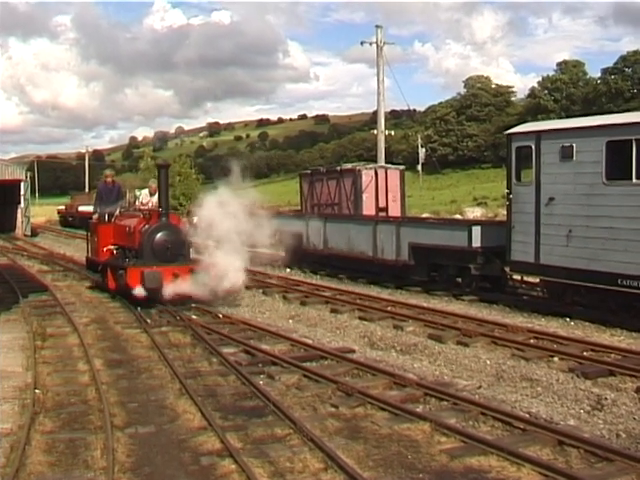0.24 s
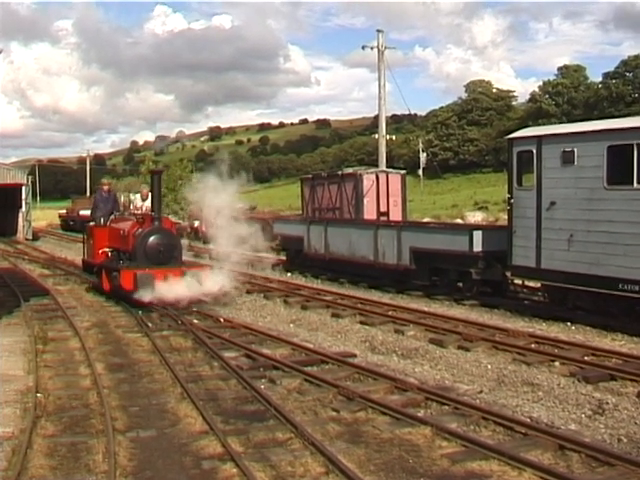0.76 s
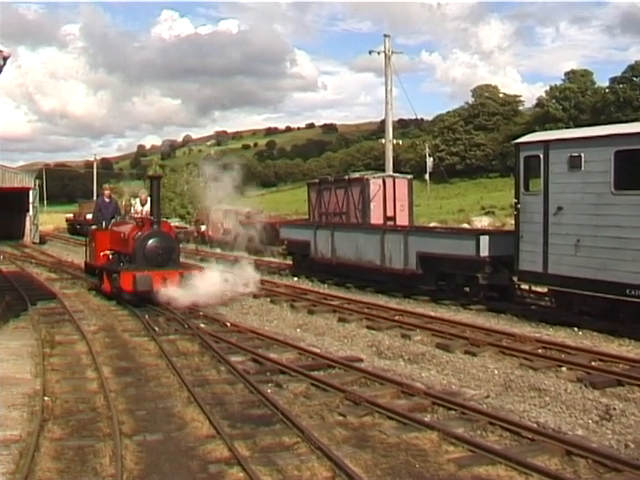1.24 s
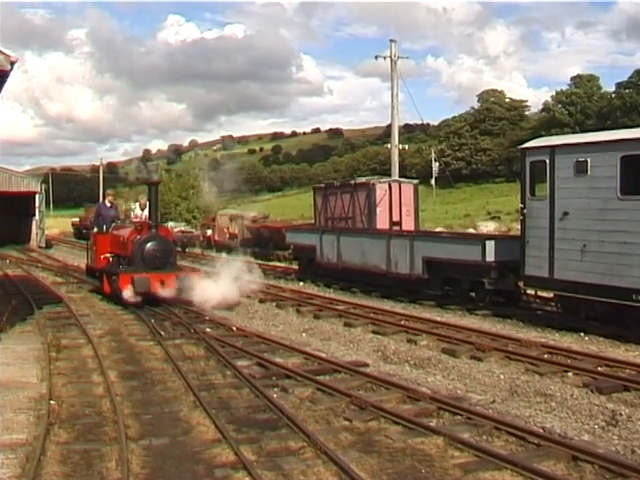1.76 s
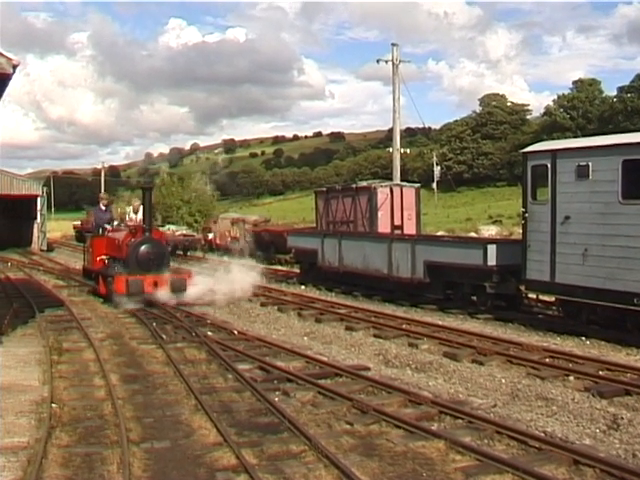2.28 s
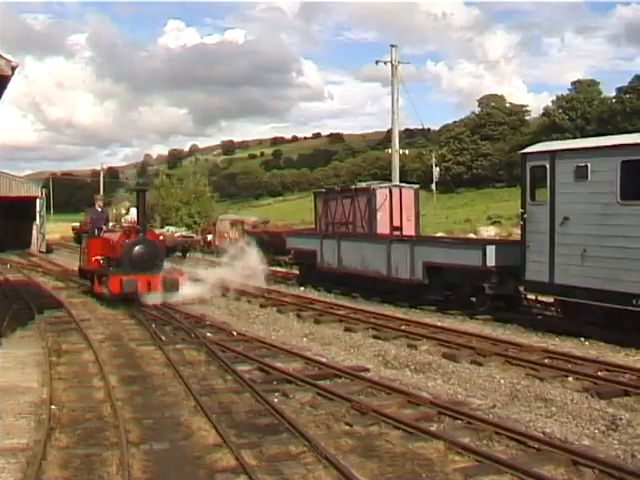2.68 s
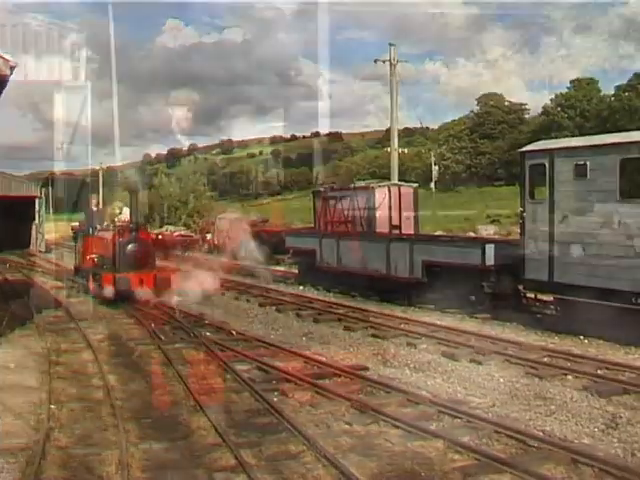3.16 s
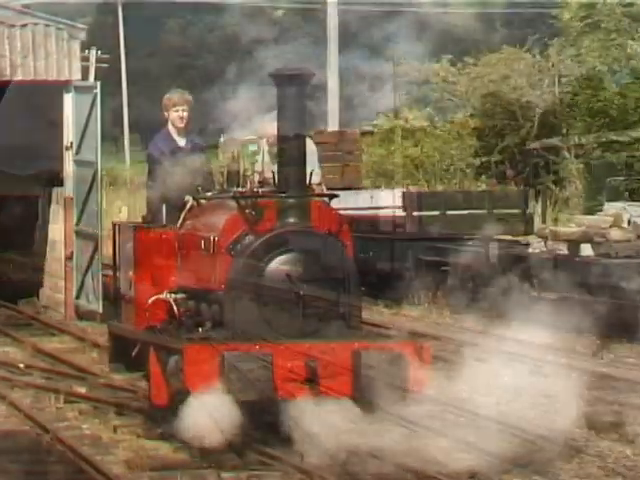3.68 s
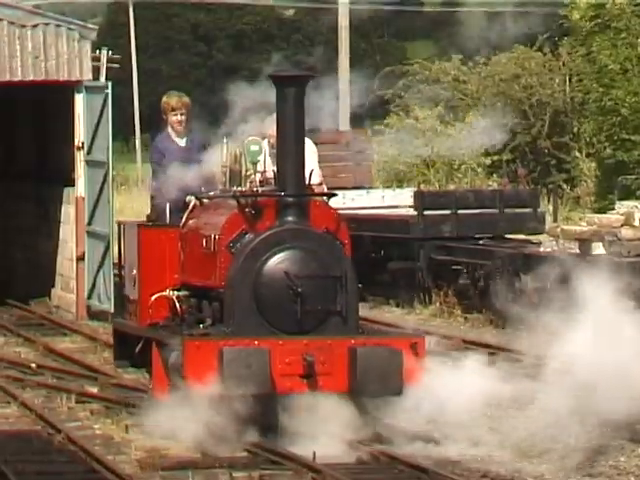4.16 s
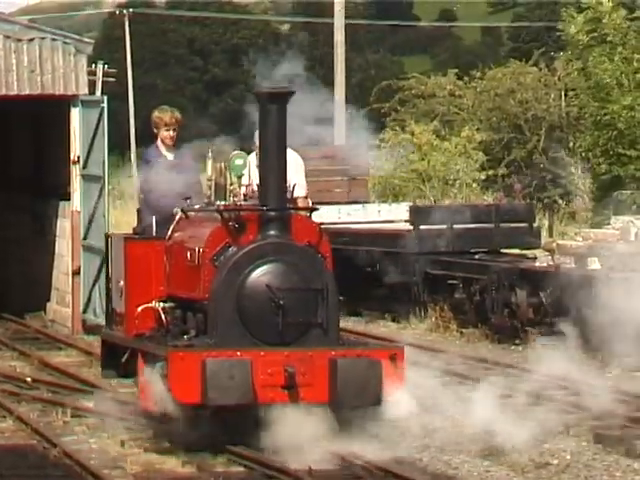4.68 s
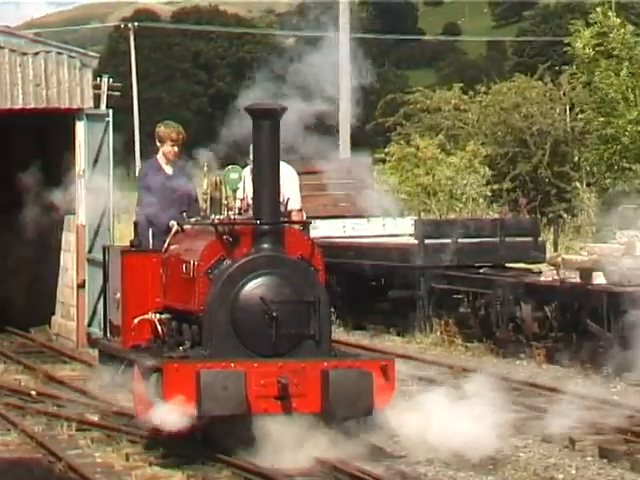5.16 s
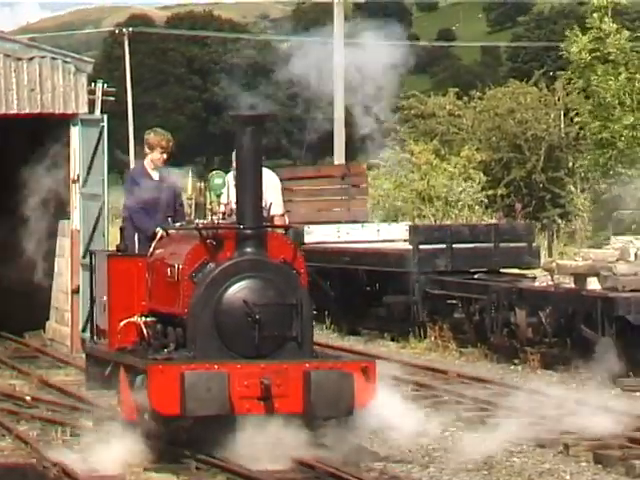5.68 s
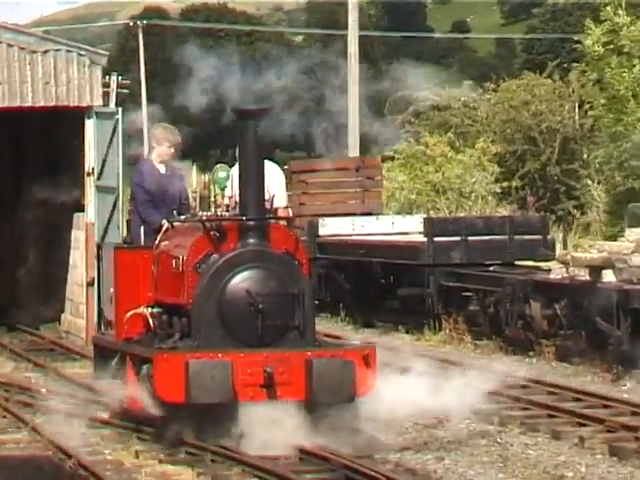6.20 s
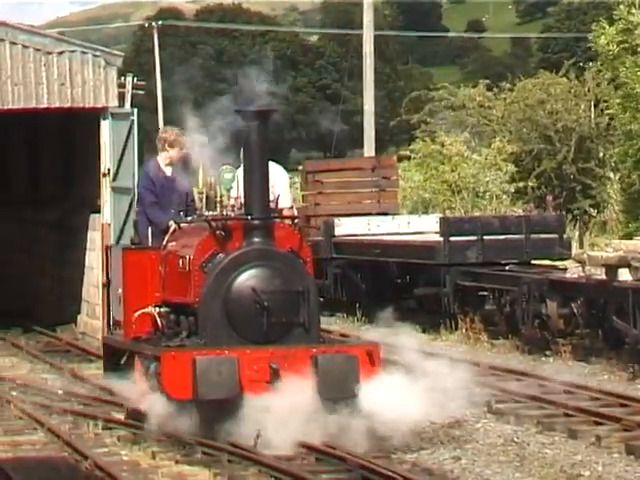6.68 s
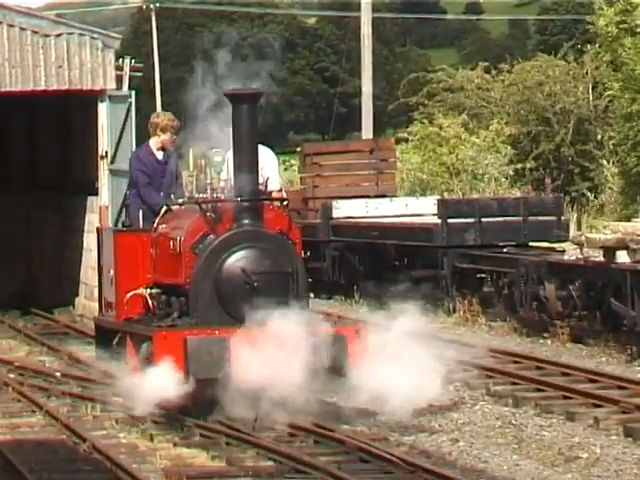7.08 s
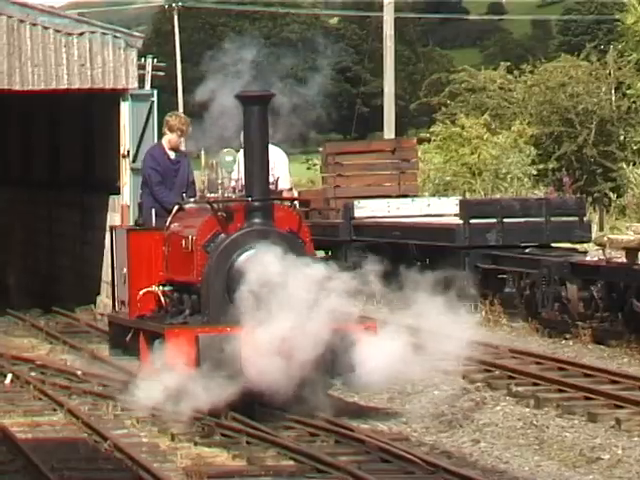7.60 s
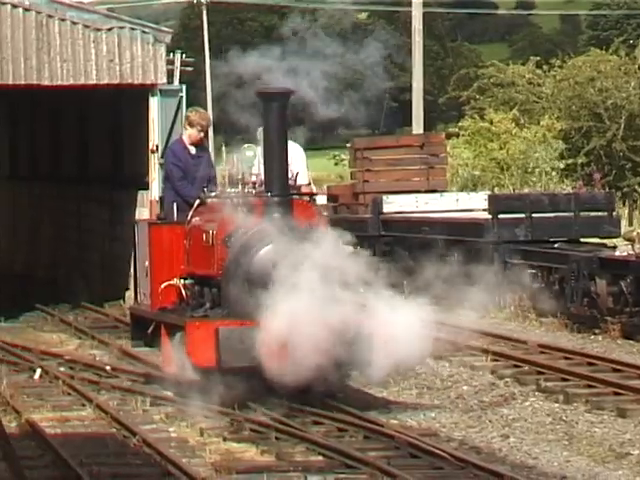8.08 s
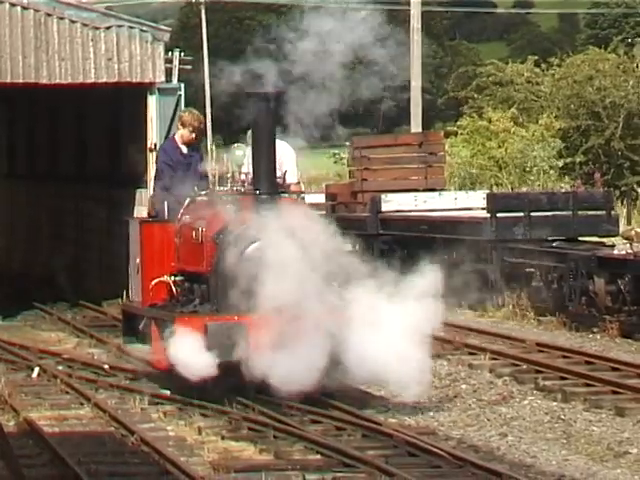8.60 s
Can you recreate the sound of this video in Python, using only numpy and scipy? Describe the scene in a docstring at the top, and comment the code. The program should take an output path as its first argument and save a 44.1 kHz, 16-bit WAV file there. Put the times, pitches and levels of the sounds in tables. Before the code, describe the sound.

Bright, wet steam hiss surges again and again from a slow little engine, with faint clanks and light wind on the microphone.

```python
"""Steam locomotive with open drain cocks

A small engine creeps through a railway yard. Each piston stroke sends a surge of wet steam hissing
through the ringing drain pipes; the running gear knocks and squeaks now and then. Behind it the yard
rumbles, a distant road vehicle gathers speed and wind buffets the microphone.
Nearly all the sound sits on the left."""
import sys
import numpy as np
from scipy import signal
from scipy.fft import rfft, irfft, next_fast_len
from scipy.io import wavfile
from scipy.ndimage import uniform_filter1d

SR = 44100
rng = np.random.default_rng(int(sys.argv[2]) if len(sys.argv) > 2 else 0)


def wav_out(sig):
    """Save sig, one row per channel (or a flat mono array), as 16-bit PCM at SR to the path in sys.argv[1]."""
    wavfile.write(sys.argv[1], SR, np.round(np.clip(np.atleast_2d(sig).T, -1, 1) * 32767).astype(np.int16))


N = 390264
T = np.arange(N) / SR


def from_db(db):
    """Decibels to gain."""
    return np.exp(np.asarray(db) * (np.log(10) / 20))


def rms_one(x):
    """Scale to unit rms."""
    return x / np.sqrt(np.mean(x ** 2) + 1e-20)


def evened(x):
    """Hold the rms at 1 over a fifth of a second."""
    return x / np.sqrt(uniform_filter1d(x ** 2, size=SR // 5) + 1e-20)


def in_time(rows):
    """The columns of a breakpoint curve at every sample."""
    time_s, *columns = np.transpose(rows)
    return [np.interp(T, time_s, column) for column in columns]


def drift(rate_hz):
    """Smooth random wander with spread 1."""
    hop, settle = 40, 2000
    pole = np.exp(-2 * np.pi * rate_hz * hop / SR)
    noise = rng.standard_normal(N // hop + settle + 2)
    slow = signal.lfilter([1], [1, -2 * pole, pole * pole], noise)[settle:]
    return np.interp(np.arange(N) / hop, np.arange(len(slow)), rms_one(slow))


def coloured_noise(spectrum):
    """Noise of unit rms, shaped by rows of freq_hz, density_db."""
    size = next_fast_len(N)
    hz, db = np.transpose(spectrum)
    bins = np.maximum(np.fft.rfftfreq(size, 1 / SR), 1)
    gain = from_db(np.interp(np.log(bins), np.log(hz), db)) * (bins > hz[0] / 2) * (bins < hz[-1] * 2)
    return rms_one(irfft(rfft(rng.standard_normal(size)) * gain, size)[:N])


def resonate(x, hz, width_hz):
    """One resonance, gain 1 at its peak."""
    r = np.exp(-np.pi * width_hz / SR)
    feedback = [1, -2 * r * np.cos(2 * np.pi * hz / SR), r * r]
    return signal.lfilter(np.array([1, 0, -1]) * (1 - r * r) / 2, feedback, x + 1e-18)


def noise_band(hz, width_hz):
    """Noise sent twice through one resonance, for steeper skirts."""
    return resonate(resonate(rng.standard_normal(N), hz, width_hz), hz, width_hz)


def low_pass(x, hz, order):
    """Butterworth low-pass."""
    return signal.sosfilt(signal.butter(order, hz, fs=SR, output="sos"), x)


def swell(start_s, length_s):
    """A rounded rise and fall."""
    return np.sqrt(np.sin(np.pi * np.clip((T - start_s) / length_s, 0, 1)).clip(0))


def yard(trim_db=2.5, patchy_db=1.5):
    """Low roar of the rolling engine and its surroundings."""
    # colour of the rumble: freq_hz, density_db
    spectrum = [(25, 10.5), (60, -5), (130, -1), (200, 4), (270, 5), (350, 3.5), (480, 1.5), (700, 0.5),
                (1000, -2), (1400, -5.5), (2500, -3), (6000, -33)]
    # rise and fall of the rumble: time_s, level_db
    levels = [(0, -50.5), (2.8, -51.5), (3.3, -48.5), (3.98, -49.5), (4.02, -55), (5.4, -54), (7.7, -55.5),
              (8.45, -53.5), (8.85, -54)]
    return coloured_noise(spectrum) * from_db(in_time(levels)[0] + trim_db + patchy_db * drift(9.1))


def traffic(octave_db=-11, waver=0.0029):
    """A distant road vehicle's firing note climbs, and its gears whine above it."""
    # engine gathering speed: time_s, firing_hz, level_db
    engine = [(0, 44.8, -72), (.45, 45.7, -53), (1, 52.4, -62.5), (2, 60.7, -54.5), (2.8, 69, -60.5),
              (3.5, 76.5, -44), (4, 81.1, -53), (4.6, 85.1, -50), (5.2, 89, -60)]
    # gear whines, one glide each: start_s, end_s, start_hz, end_hz, level_db
    whines = [(1.802, 2.696, 350.5, 406, -60), (2.552, 3.258, 402.4, 451, -55.5),
              (3.252, 4.032, 372.6, 419, -53), (5.7, 7.102, 284, 298.3, -61.5)]
    firing_hz, engine_db = in_time(engine)
    phase = 2 * np.pi * np.cumsum(firing_hz) / SR
    fade_out = 2 * np.clip(engine[-1][0] - T, 0, .5)
    out = from_db(engine_db) * (np.sin(phase) + from_db(octave_db) * np.sin(2 * phase)) * fade_out
    for start_s, end_s, start_hz, end_hz, level_db in whines:
        pitch_hz = np.interp(T, [start_s, end_s], [start_hz, end_hz]) * (1 + waver * drift(8.3))
        envelope = from_db(level_db + 0.6 * drift(4)) * swell(start_s, end_s - start_s)
        out += envelope * np.sin(2 * np.pi * np.cumsum(pitch_hz) / SR)
    return np.sqrt(2) * out


def wind(trim_db=1.0, lumpy_db=2.0):
    """Eddies thump the microphone: a breeze that rises and falls, with short gusts on top."""
    # bed of breeze: time_s, level_db
    breeze = [(0, -60), (1, -56), (2.85, -61.5), (3.05, -47.5), (3.6, -42.5), (4.2, -50), (4.7, -43.5),
              (5.6, -44), (6.1, -49.5), (6.85, -49.5), (7.15, -60), (8.3, -56), (8.85, -63)]
    # gusts: start_s, length_s, level_db
    gusts = [(.58, 0.13, -46.5), (2.08, 0.097, -48), (3.25, 0.091, -39.5), (3.47, .2, -38),
             (3.68, 0.097, -37.5), (4.43, .08, -43), (4.67, 0.071, -37), (4.848, .06, -47),
             (4.988, .17, -39), (5.306, 0.081, -40), (5.487, 0.11, -42), (5.69, .17, -41),
             (6.286, 0.084, -42.5), (6.788, .07, -42), (7.08, .04, -43), (8.1, .14, -51)]
    # colour of the eddies: freq_hz, density_db
    spectrum = [(12, -37), (20, -2.5), (48, -0.5), (81, -0.5), (128, -4.5), (242, -20), (285, -22.5),
                (315, -30), (400, -29), (520, -53), (880, -120)]
    gust_power = sum((from_db(db) * swell(start_s, length_s)) ** 2 for start_s, length_s, db in gusts)
    power = from_db(in_time(breeze)[0]) ** 2 + gust_power
    eddies = evened(coloured_noise(spectrum) * from_db(lumpy_db * drift(21)))
    return eddies * from_db(trim_db) * np.sqrt(power)


def running_gear(spread_octaves=0.21, squeak_width_hz=90):
    """Slack in the rods and wheels takes up in short rattles that ring the frame; the wheels squeak."""
    # ring of the frame: pitch_hz, width_hz, level_db
    frame_modes = [(187, 42, -1.5), (245, 29, 1.5), (298, 67, 2), (516, 94, -8), (678, 48, 4),
                   (870, 110, -0.5), (1140, 200, 1)]
    # knocks, each strongest around one pitch: start_s, level_db, pitch_hz, decay_s
    knocks = [(2.098, -38, 1000, .015), (2.123, -41.5, 650, 0.044), (2.131, -41.5, 252, 0.056),
              (2.23, -47, 240, 0.044), (3.888, -33, 1000, 0.018), (3.965, -40, 603, 0.022),
              (5.956, -40.5, 746, 0.0092), (6.601, -46, 680, 0.0073), (7.886, -37, 190, 0.036),
              (7.902, -46, 520, .03), (7.908, -49, 950, .025), (8.388, -43.5, 220, 0.027),
              (8.445, -41.5, 220, 0.053), (8.53, -49, 219, 0.075)]
    # wheel squeaks: start_s, length_s, pitch_hz, level_db
    squeaks = [(2.098, .06, 3170, -39), (2.204, 0.067, 2850, -42), (3.933, 0.069, 3040, -35.5),
               (3.97, 0.031, 3420, -32.5)]
    age = np.arange(SR // 4) / SR
    out = np.zeros(N)
    for mode_hz, width_hz, mode_db in frame_modes:
        contacts = np.zeros(N)
        for start_s, level_db, pitch_hz, decay_s in knocks:
            start = int(start_s * SR)
            reach = np.exp(-.5 * (np.log2(mode_hz / pitch_hz) / spread_octaves) ** 2)
            contacts[start:start + len(age)] += from_db(level_db) * reach * np.exp(-age / decay_s)
        ring = resonate(contacts * rng.standard_normal(N), mode_hz, width_hz)
        out += from_db(mode_db) * ring * np.sqrt(SR / (np.pi * width_hz))  # same power at any width
    for start_s, length_s, pitch_hz, level_db in squeaks:
        squeak = rms_one(resonate(rng.standard_normal(N), pitch_hz, squeak_width_hz))
        out += from_db(level_db) * swell(start_s, length_s) * squeak
    return out


def scatter(x, echo_db=-10.0, decay_s=0.014, count=3):
    """Ballast, rails and wagons throw back a haze of weak echoes, which slowly shifts."""
    delay = np.arange(SR // 12) / SR
    weights = np.array([drift(0.84) for _ in range(count)])
    weights /= np.sqrt(np.sum(weights ** 2, axis=0) + 1e-3)
    haze = 0
    for weight in weights:
        echoes = rng.standard_normal(len(delay)) * np.exp(-delay / decay_s)
        haze += weight * signal.oaconvolve(x, echoes / np.sqrt(np.sum(echoes ** 2)))[:N]
    return x + from_db(echo_db) * haze


def spray(surge_db, base_db=-7.5, decline_db_per_s=0.54, thinning=0.21):
    """Level curve of the spray in dB: it thins slowly as time goes on, and in strong surges."""
    # slugs of condensed water sizzling out: start_s, length_s, boost_db
    slugs = [(.14, .12, 2), (.3, 1.3, 3), (2.08, 0.27, 2.5), (2.62, 0.53, 2.5), (3.3, .7, 2.5),
             (4.05, .25, 2), (4.319, .31, 4.5), (5.29, .18, 3.3), (5.65, 0.28, 3.5), (6.64, 0.13, 3),
             (7.24, .16, 4), (7.6, 0.5, 2.5), (8.24, 0.24, 4)]
    boost_db = sum(db * swell(start_s, length_s) for start_s, length_s, db in slugs)
    return base_db - decline_db_per_s * T - thinning * surge_db + boost_db


def strokes(sag_db_per_s=5.5, shut_db_per_s=33.5, leak_hollow_db=-11, leak_edge_db=-17):
    """Strokes swell and tint the leak's hiss; gives flow, hollow tone, edge tone and spray in dB."""
    # steady leak from the cocks: time_s, level_db
    leak = [(0, -32), (2.8, -33), (3.98, -31), (4.01, -31.5), (5, -32.5), (7.4, -38), (8.85, -33.5)]
    # one surge a stroke, relative to the leak: start_s, attack_s, open_s, level_db, hollow_db, edge_db
    surges = [(-.1, .12, 0.19, -.4, 3.5, 0), (.198, 0.1, .37, 8, 2.5, 1), (.64, 0.12, 0.33, 2, 1, -4),
              (.99, 0.089, .22, 3.5, -0.5, -4), (1.35, .12, 0.22, 1, -3, 5), (1.65, .13, .32, 7.5, 0.1, -4),
              (2.09, .12, 0.24, 0.8, 2, 3), (2.37, 0.13, .26, 2.5, 0.2, 2), (2.88, 0.046, 0.095, 4, 3, -4),
              (3.07, 0.091, 0.5, 7.5, -0.3, -1), (3.49, 0.1, 0.49, 5, -1, 4), (4.29, .1, 0.26, 0, 0, -2),
              (5.085, 0.13, 0.4, 6.5, -4, 7), (5.64, .1, 0.3, 0.5, -3, 4), (6.02, 0.17, .34, 2.5, -3, 7),
              (6.5, .12, 0.28, 1, -5, 3), (6.86, 0.11, 0.29, 6, 3.5, -3), (7.39, 0.099, 0.26, -5, 8, -4),
              (7.75, 0.12, .25, -1, 0, -3), (8.165, 0.17, .3, 9.8, -4, -11), (8.5, 0.17, .4, 11, -2, -12)]
    power, hollow_tint, edge_tint = 1, 0, 0
    for start_s, attack_s, open_s, level_db, hollow_db, edge_db in surges:
        age = np.maximum(T - start_s, 0)
        # a surge sinks slowly while the port is open, fast once it shuts
        fall_db = sag_db_per_s * age + shut_db_per_s * np.maximum(age - open_s, 0)
        surge = (np.minimum(age / attack_s, 1) * from_db(level_db - fall_db)) ** 2
        power += surge
        hollow_tint += hollow_db * surge
        edge_tint += edge_db * surge
    surge_db = 10 * np.log10(power)
    flow_db = in_time(leak)[0] + surge_db
    return flow_db, leak_hollow_db + hollow_tint / power, leak_edge_db + edge_tint / power, spray(surge_db)


def choke(start_s=1.67, length_s=0.46, centre_hz=4700, width_hz=3100, level_db=-4):
    """One cock chokes briefly and blows a lower, broader rush."""
    return rms_one(noise_band(centre_hz, width_hz)) * from_db(level_db) * swell(start_s, length_s)


def edge_tone(pitch_hz=4950, width_hz=220, waver_hz=120):
    """At the lip of a cock the flow almost locks into a whistle: a narrow, wavering band of noise."""
    phase = 2 * np.pi * np.cumsum(pitch_hz + waver_hz * drift(25.03)) / SR
    along, across = low_pass(rng.standard_normal((2, N)), width_hz / 2, order=2)
    return rms_one(along * np.cos(phase) + across * np.sin(phase))


def drain_pipes(flutter_db=0.8, patchy_db=0.65):
    """Turbulence rings the drain pipes, each resonance flickering on its own."""
    # pipe resonances: pitch_hz, width_hz, level_db
    pipe_modes = [(1528, 340, -7), (1791, 490, -2), (2686, 490, -5), (3000, 490, -6.5), (3630, 1040, -8.5),
                  (4530, 480, -6.5), (5094, 740, -0.5), (5740, 1380, -2), (7000, 1200, -9.5),
                  (7980, 2200, -10), (9600, 1520, -5.5), (10800, 1300, -10.5), (12860, 4000, -5)]
    out = 0
    for pitch_hz, width_hz, level_db in pipe_modes:
        ring = noise_band(pitch_hz, width_hz)
        out += ring * from_db(level_db + flutter_db * drift(25) + patchy_db * drift(4.1))
    return rms_one(out)


def steam(flow_db, hollow_db, edge_db, spray_db, edge_flutter_db=1.6, sputter_db=0.36,
          hollow_trim_db=-1.56, hiss_trim_db=-1.89, sizzle_trim_db=-2.5):
    """Steam leaves the ringing pipes as a free jet; the water in it makes it sizzle and sputter."""
    # broad rush of the free jet: freq_hz, density_db
    spectrum = [(300, -28), (800, -8), (1300, -5.5), (2000, -2.5), (2350, -6), (3000, 1), (4200, -0.5),
                (6500, 0), (8500, -1.5), (10000, 3), (11500, -5.5), (13500, -4), (16000, -8)]
    # balance of the jet against the pipe ring: time_s, level_db
    jet_share = [(0, 1), (1.4, 3), (2.8, 1), (4, -3.5), (5.3, -6), (6.5, -6), (7.6, -3.5), (8.85, -4)]
    jet = evened(drain_pipes() + from_db(in_time(jet_share)[0]) * coloured_noise(spectrum))
    jet = scatter(jet + choke() + edge_tone() * from_db(edge_db + edge_flutter_db * drift(16.0)))
    # the hollow low pipe tone and the fine spray come and go with the wetness of the steam
    low = signal.sosfiltfilt(signal.butter(6, 2300, fs=SR, output="sos"), jet)
    high = signal.sosfiltfilt(signal.butter(4, 11000, "high", fs=SR, output="sos"), jet)
    hiss = evened(jet - low - high) * from_db(hiss_trim_db)
    hollow = evened(low) * from_db(hollow_db + hollow_trim_db)
    sizzle = evened(high) * from_db(uniform_filter1d(spray_db, size=SR // 10) + sizzle_trim_db)
    return (hiss + hollow + sizzle) * from_db(flow_db + sputter_db * drift(61))


def scene(gain_db=5.0, background_db=3.0, bleed_db=-10.0, bleed_hz=700, stray_db=-29, murk_db=-16):
    """The mix sits left; the right gets a faint, dull, inverted copy and its own faint hiss and rumble."""
    # colour of the stray hiss on the right: freq_hz, density_db
    stray_spectrum = [(100, 4), (1800, 11), (5000, 8), (15000, -1.5)]
    flow_db, hollow_db, edge_db, spray_db = strokes()
    cocks = steam(flow_db, hollow_db, edge_db, spray_db)
    background = from_db(background_db) * (yard() + wind() + traffic())
    left = cocks + background + running_gear()
    stray = from_db(flow_db + stray_db) * coloured_noise(stray_spectrum)
    bleed = -from_db(bleed_db) * low_pass(left, bleed_hz, order=1)
    right = bleed + stray + from_db(murk_db) * yard()
    return from_db(gain_db) * np.array([left, right])


def record(dry, low_cut_hz=30, high_cut_hz=15720):
    """The microphone sheds the deepest bass; the top is cut steeply."""
    heard = signal.sosfilt(signal.butter(3, low_cut_hz, "high", fs=SR, output="sos"), dry)
    return signal.sosfilt(signal.ellip(12, .1, 90, high_cut_hz, fs=SR, output="sos"), heard)


dry = scene()
out = record(dry)
wav_out(out)
```